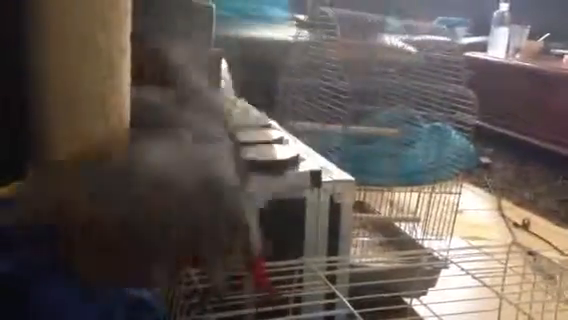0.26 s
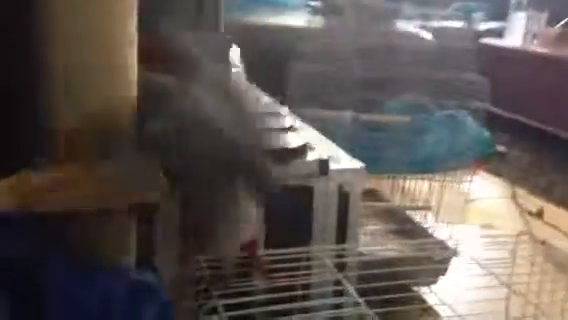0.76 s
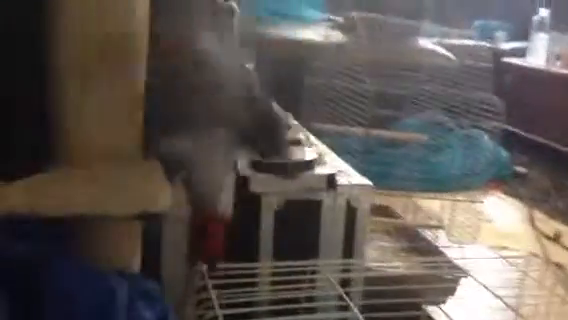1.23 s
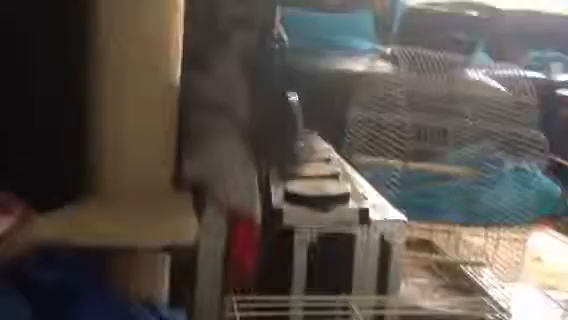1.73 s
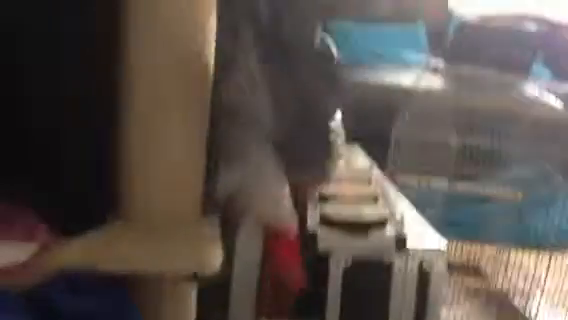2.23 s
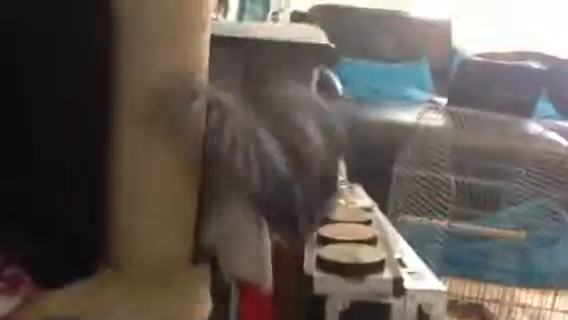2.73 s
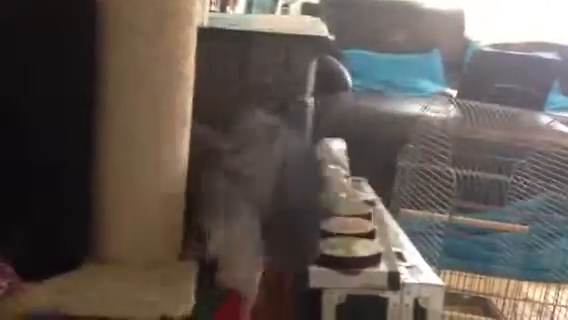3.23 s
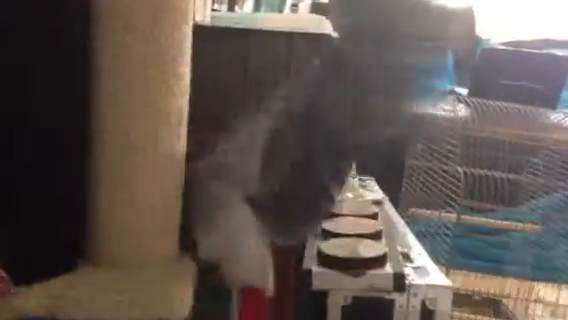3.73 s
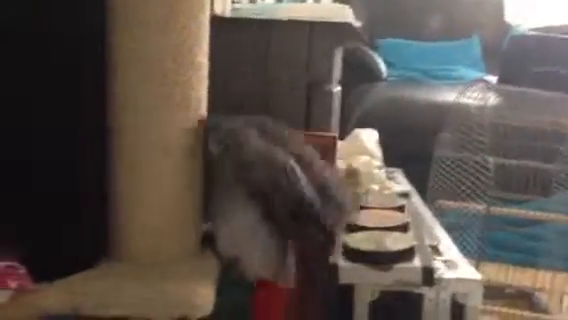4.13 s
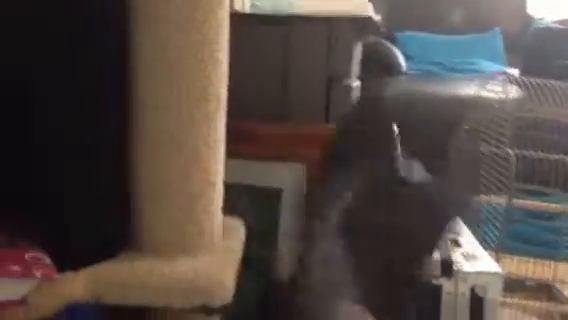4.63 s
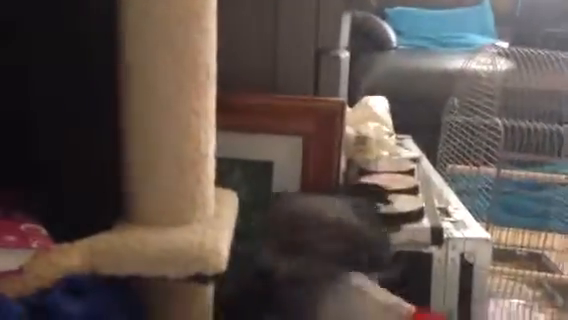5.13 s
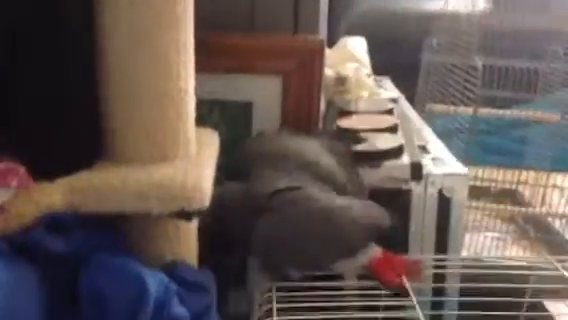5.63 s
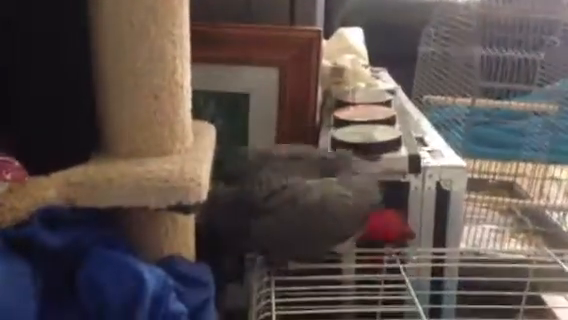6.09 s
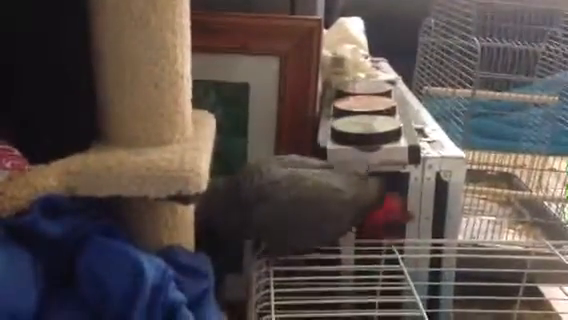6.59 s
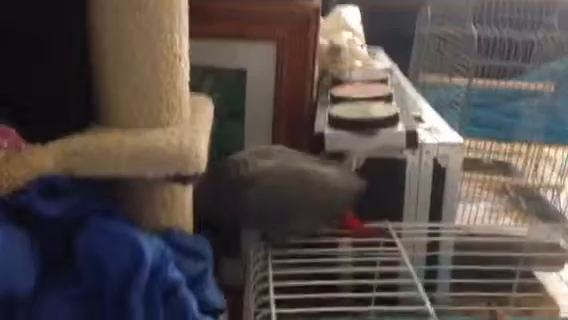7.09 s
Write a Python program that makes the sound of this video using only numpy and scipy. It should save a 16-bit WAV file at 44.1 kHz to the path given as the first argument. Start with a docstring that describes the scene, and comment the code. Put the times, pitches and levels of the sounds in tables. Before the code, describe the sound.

Quick wingbeats flutter and slap indoors until a bird thuds onto cage wire, followed by claw scrapes, a cluck and a small squeak.

```python
"""Parrot flapping on a cage

A grey parrot beats its wings on top of a wire cage in a small room, about six strokes a second.
Each stroke pushes air and rubs the feathers together, and the wing tips slap things nearby.
The bird hops down with a thud of the frame and a clash of wire, shuffles over the bars,
and gives a cluck of the tongue, a soft squeak and a faint whistle."""
import sys
import numpy as np
from scipy import signal
from scipy.io import wavfile

SR = 44100
rng = np.random.default_rng(int(sys.argv[2]) if len(sys.argv) > 2 else 0)


def wav_record(signal):
    """Record a signal, one row per channel, as 16-bit PCM in the file named by sys.argv[1]."""
    frames = np.transpose(np.atleast_2d(signal))
    bounded = np.clip(frames, -1, 1)
    # unit amplitude maps onto the largest positive 16-bit level
    quanta = np.round(bounded * 32767).astype(np.int16)
    wavfile.write(sys.argv[1], SR, quanta)


N = 324134
TIME = np.arange(N) / SR

# Levels in the tables are relative: the functions may add a gain of their own.
# downstrokes of the wings: t/s, length/s, level/dB
WING_BEATS = [(0, 0.026, -52.5), (.1, 0.055, -53.5), (.247, 0.046, -51.5), (0.402, 0.029, -50.5),
              (.562, 0.041, -49), (.717, 0.065, -53.5), (.867, 0.054, -50.5), (1.017, 0.056, -54),
              (1.169, 0.064, -55), (1.317, 0.044, -53.5), (1.48, 0.057, -58.5), (1.666, 0.058, -62.5),
              (1.869, .055, -58.5), (2.068, 0.056, -52), (2.19, 0.075, -56), (2.342, 0.089, -57),
              (2.495, 0.043, -54), (2.66, 0.063, -55.5), (2.835, 0.071, -61.5), (3.215, 0.046, -55),
              (3.357, .035, -51), (3.523, 0.073, -59.5), (3.714, 0.11, -62.5), (4.325, 0.1, -60),
              (4.395, 0.026, -47), (4.53, 0.053, -45)]
# how hard the wings drive the air (0 = loose fanning, 1 = full power): t/s, effort
WING_EFFORT = [(0, 0.86), (1.15, 0.89), (1.5, 0.25), (2.7, 0.091), (3.2, 0.12), (3.4, 0.85), (4.5, 0.4)]
# the folded wings are ruffled into place: t/s, length/s, level/dB
RUFFLES = [(4.98, 0.17, -66), (5.9, 0.059, -60.5), (6.82, 0.068, -67)]
# spectra of the pushed air, the air rushing past and the rubbing feathers: f/Hz, level/dB
PUSH_SPECTRUM = [(60, -46), (105, -32.5), (150, 1.5), (240, -3.5), (400, -6.5), (600, -12.5), (1000, -36),
                 (2000, -53)]
WHOOSH_SPECTRUM = [(250, -34), (450, -4.5), (700, -5), (1200, -3), (2100, -4.5), (3100, -10.5), (4500, -20),
                   (8000, -52)]
HISS_SPECTRUM = [(1200, -58.5), (2600, 1), (3700, -2.5), (6300, 4), (9000, -0.5), (12000, 1.5), (15500, -7)]
# rustling between strokes: t/s, level/dB
RUSTLE_LEVELS = [(0, -63), (.9, -58), (1.2, -54), (1.45, -60.5), (1.6, -64.5), (1.95, -61.5), (2.3, -59.5),
                 (2.7, -68), (3.3, -65.5), (4.3, -64.5), (4.5, -58), (4.9, -75), (5.05, -57), (5.2, -67.5),
                 (5.38, -63.5), (5.6, -70.5), (7.3, -67.5)]
# spectrum of that rustling: f/Hz, level/dB
RUSTLE_SPECTRUM = [(70, -33.5), (160, 9), (400, 0.5), (700, -2.5), (2200, -1), (3500, -3.5), (7000, -4.5),
                   (15000, -7)]
# wing tips slapping: t/s, contact/s, level/dB, tilt/(dB per octave), extra bass/dB, knock f/Hz, knock/dB
WING_SLAPS = [(0.81, .003, -57.5, 6, -4, 9620, 15), (1.227, 0.0064, -47, -2, 1.5, 2520, -5),
              (1.2372, 0.0012, -41, -1.6, -2, 2580, -6), (1.3969, 0.0012, -39, -.7, -0.5, 3400, 2),
              (1.7419, 0.0021, -48.5, 0.5, -14, 1920, 8), (1.768, .008, -51, -0.5, 3, 3960, -14),
              (2.548, 0.0026, -42.5, 1.5, 8, 4050, 5), (2.576, 0.0033, -49.5, -1.5, -7, 1760, 19),
              (2.8914, .002, -42.5, 1.5, 8, 2000, 1), (2.9106, 0.0025, -42.5, -0.5, 1, 2150, -3),
              (3.275, 0.0019, -40, 0, 1.5, 900, -8), (3.436, .0015, -48, -5, -16, 2780, 19),
              (3.438, 0.0012, -43.5, -2.5, -11, 1870, 20), (3.6254, .0011, -47.5, -3.5, -7.5, 1970, 1),
              (3.65, 0.0095, -55, 7, -8, 4340, -10), (3.8076, 0.0028, -47, 3, 7, 5660, 5),
              (4.4113, 0.0048, -35.5, -3, -5, 1840, -3), (4.4243, 0.00072, -36.5, -1.5, -6, 1790, 9),
              (4.532, .003, -47, 2.5, -2, 6500, 4), (4.5573, 0.00091, -40, -3.5, -5, 2720, 6)]

# hits on the wire, and one thin, dry, very high tick at 5.17 s:
# t/s, contact/s, level/dB, tilt/(dB per octave), knock f/Hz, knock/dB
WIRE_HITS_AND_TICK = [(4.5861, 0.0031, -21.5, -0.5, 1984, 5), (4.781, 0.0049, -48, -4, 1225, 15),
                      (4.961, 0.0034, -60.5, 1, 4350, 2), (5.0335, 0.0022, -52.5, -2, 1710, 5),
                      (5.091, 0.0025, -57.5, 3, 8100, 5), (5.1733, .0006, -73, 10.5, 13500, 28),
                      (5.2505, 0.0033, -48, 0.6, 5550, -15), (6.255, 0.0012, -73, 5.5, 7940, 11),
                      (7.02, 0.0033, -60.5, 6, 9000, 4)]
# the bass, middle, treble and top bands of a hit: low f/Hz, high f/Hz
HIT_BANDS = [(160, 650), (650, 3000), (3400, 8500), (8500, 15500)]
# tone of a slap and of a wire hit before tilting: bass/dB, middle/dB, treble/dB, top/dB
SLAP_COLOUR = (-10.5, -1.5, 1.5, -4)
WIRE_COLOUR = (-29.5, -3, -1.5, -6)
# the bird's weight coming down on the cage: t/s, level/dB
THUDS = [(4.423, -43.5), (4.528, -43.5), (4.551, -44.5), (4.575, -47), (4.612, -45.5), (4.655, -47),
         (4.819, -49.5), (5.29, -57.5), (6.985, -58.5), (7.292, -55)]
# a claw lets go of a bar: t/s, level/dB
TWANGS = [(5.254, -44.5)]
# claws dragging along the bars: t/s, length/s, level/dB, f/Hz
SCRAPES = [(3.993, 0.28, -69, 2050), (4.779, 0.042, -45, 1180), (4.796, 0.045, -82, 1800),
           (4.852, 0.096, -57.5, 1130), (5.239, 0.083, -58, 2270), (5.385, 0.062, -58.5, 2050),
           (6.818, 0.067, -64, 1750), (7.253, 0.074, -69, 1820)]
# the bird shuffling about: t/s, length/s, level/dB
SHUFFLES = [(4.852, 2.53, -66)]
# where a gripped bar, a free bar, the frame and the beak ring: f/Hz, width/Hz, level/dB
GRIPPED_BAR_MODES = [(2040, 200, -3.5), (4070, 170, 6.5), (4920, 50, 14.5), (5670, 67, 9), (6810, 38, 0),
                     (9250, 40, -1), (11000, 350, 5.5)]
FREE_BAR_MODES = [(2350, 22, -3), (3740, 40, -8), (4640, 40, -7), (5570, 35, 0), (6465, 60, -7)]
FRAME_MODES = [(160.3, 17, 8.5), (203, 18, 10), (255.5, 63, 10), (352, 120, -2.5), (503, 38, 1.5)]
BEAK_MODES = [(827, 24, 4), (1640, 210, 0), (2390, 85, 0), (3030, 77, -29), (4910, 48, -3), (6200, 66, -5),
              (6940, 44, -26), (8300, 40, -5)]

# spurts of the squeak: t/s, length/s, level/dB
SQUEAK_SPURTS = [(6.366, 0.029, -42.5), (6.425, 0.019, -49), (6.508, 0.011, -48), (6.56, 0.051, -58)]
# harmonics of the squeak: multiple of the pitch, level/dB
SQUEAK_HARMONICS = [(1, -3), (2, -4), (3, -15.5)]
# the one whistle: t/s, length/s, level/dB
WHISTLE = [(6.73, 0.16, -74.5)]

# how long the room's echo takes to fade by 60 dB: f/Hz, fade time/s
ROOM_FADE_TIMES = [(150, 0.57), (600, 0.72), (2000, 0.33), (5000, 0.45), (9000, 0.32), (15000, 0.39)]
# spectrum of the room's background noise: f/Hz, level/dB
ROOM_TONE_SPECTRUM = [(18, -74), (30, -35), (105, -22), (144, -9.5), (256, -6.5), (639, -19.5), (728, -36),
                      (1230, -17.5), (2070, -28), (2830, -23), (3320, -26), (3980, -25.5), (5310, -26),
                      (6720, -25), (15500, -33)]


def wings(rise_s=0.0053, loose_rise_s=0.016, fall_s=0.023, push_fade_s=0.073, whoosh_fade_s=0.31):
    """Each stroke pushes air, sends it rushing past the wing and slides the feathers over each other."""
    push, whoosh, hiss = np.zeros((3, N))
    for s, length, db, effort in strokes():
        slack = 1 - effort  # a loose stroke swells more slowly and moves less air
        stroke = swell(s, length, rise_s + loose_rise_s * slack ** 2, fall_s)
        age = np.maximum(TIME - s, 0)
        push += from_db(db - 3.5 - 13.5 * slack) * stroke * np.exp(-age / push_fade_s)
        whoosh += from_db(db - 2.75 - 2.5 * slack) * stroke * np.exp(-age / whoosh_fade_s)
        hiss += from_db(db) * stroke
    # after a slap the feathers slide off the edge they hit
    slides = [from_db(db - 12.5) * swell(s + rise_s, 0.039, rise_s, fall_s)
              for s, _, db, *_ in WING_SLAPS]
    hiss += np.max(slides, axis=0)
    hiss = np.interp(TIME - 0.0025, TIME, hiss)  # the hiss comes a moment after the air
    thump = push * (shaped_noise(PUSH_SPECTRUM) + from_db(2) * eddy())
    rush = whoosh * shaped_noise(WHOOSH_SPECTRUM)
    # the feathers' tiny barbs catch and let go in grains of very uneven size
    barbs = rng.standard_normal((2, N)) * flicker(rate_hz=1500, depth_db=2)
    rubbing = hiss * shaped_noise(HISS_SPECTRUM, barbs)
    return thump + (rush + rubbing) * flicker(rate_hz=130, depth_db=3)


def strokes(upstroke_lag_s=0.083, upstroke_s=0.021):
    """Lists downstrokes, lighter upstrokes and effortless ruffles: t/s, length/s, level/dB, effort."""
    for s, length, db in WING_BEATS:
        effort = np.interp(s, *np.transpose(WING_EFFORT))
        yield s, length, db, effort
        upstroke_db = db - 0.5 - 17.5 * (1 - effort)
        yield s + upstroke_lag_s, upstroke_s, upstroke_db, 0.72 * effort
    for s, length, db in RUFFLES:
        yield s, length, db, 0


def eddy(start_hz=480, end_hz=290, slowing_s=0.023, width_hz=130):
    """The swirl of air left by each downstroke hums hollowly and drops in pitch as it slows."""
    starts = np.sort([beat[0] for beat in WING_BEATS])
    latest = np.maximum(np.searchsorted(starts, TIME) - 1, 0)
    age = np.maximum(TIME - starts[latest], 0)
    phase = phase_of(end_hz + (start_hz - end_hz) * np.exp(-age / slowing_s))
    return rms_one(drift(width_hz) * np.cos(phase) + drift(width_hz) * np.sin(phase))


def rustle():
    """The feathers keep rustling between strokes while the bird is busy."""
    level = from_db(np.interp(TIME, *np.transpose(RUSTLE_LEVELS)))
    return level * flicker(rate_hz=35, depth_db=2) * shaped_noise(RUSTLE_SPECTRUM)


def slaps(gain_db=-2):
    """Stiff wing feathers crack against a hard edge."""
    out = np.zeros(N)
    for s, length, db, tilt, bass_db, knock_hz, knock_db in WING_SLAPS:
        levels_db = hit_levels(SLAP_COLOUR, db, tilt, bass_db)
        edge = lambda x: knock(x, levels_db, knock_hz, knock_db)
        out += strike(s, edge, contact(length, snap=1), echo_db=-3.5)
    return from_db(gain_db) * out


def wire_hits_and_tick():
    """The bars chatter briefly at each hit; the same recipe makes one thin, very high tick."""
    out = np.zeros(N)
    for s, length, db, tilt, knock_hz, knock_db in WIRE_HITS_AND_TICK:
        levels_db = hit_levels(WIRE_COLOUR, db, tilt)
        chatter = lambda x: knock(wire(x), levels_db, knock_hz, knock_db)
        out += strike(s, chatter, contact(length, snap=0.12), echo_db=0)
    return out


def wire(x, bass_cut_hz=1200):
    """Thin bars give off little bass, and the bird's grip keeps their ringing short."""
    bright = signal.sosfilt(signal.butter(1, bass_cut_hz, "high", fs=SR, output="sos"), x)
    return bright + from_db(-3) * resonate(bright, GRIPPED_BAR_MODES)


def thuds():
    """Soft, heavy steps set the whole frame booming."""
    out = np.zeros(N)
    for s, db in THUDS:
        frame = lambda x: at_level(band(resonate(x, FRAME_MODES), 120, 600, order=4), db)
        out += strike(s, frame, contact(0.0037, snap=0.75), echo_db=2)
    return out


def twang():
    """A bar rings on with a short clink when the claw lets go."""
    out = np.zeros(N)
    for s, db in TWANGS:
        bar = lambda x: at_level(resonate(x, FREE_BAR_MODES), db)
        out += strike(s, bar, contact(0.001078, snap=3.6), echo_db=-4)
    return out


def scrapes(width_hz=550):
    """A claw sticks and slips on a bar, rasping around one pitch."""
    out = np.zeros(N)
    slips = rng.standard_normal(N) * flicker(rate_hz=250, depth_db=4)
    for s, length, db, hz in SCRAPES:
        rasp = rms_one(resonate(slips, [(hz, width_hz, 0)]))
        out += from_db(db) * swell(s, length, rise_s=0.0061, fall_s=0.01) * rasp
    return out


def shuffling():
    """Small shifts of weight keep the frame rumbling softly."""
    shaking = resonate(rng.standard_normal(N), FRAME_MODES) + 0.65 * rng.standard_normal(N)
    rumble = rms_one(band(shaking, 130, 700, order=4))
    return rumble * flicker(rate_hz=12, depth_db=2) * swells(SHUFFLES, rise_s=0.05, fall_s=0.05)


def cluck(start_s=6.0503, level_db=-54.5, click_db=-14.5):
    """A short click of the tongue rings in the open beak."""
    beak = lambda x: at_level(resonate(x, BEAK_MODES) + from_db(click_db) * band(x, 1070, 7400), level_db)
    return strike(start_s, beak, contact(0.0013, snap=0.18), echo_db=9.5)


def squeak(start_hz=813, end_hz=1070, glide_s=0.1, gain_db=-7.5):
    """A hoarse little note rises and breaks up into fading spurts."""
    age = np.maximum(TIME - SQUEAK_SPURTS[0][0], 0)
    hz = end_hz + (start_hz - end_hz) * np.exp(-age / glide_s)
    phase = phase_of(hz * (1 + 0.07 * drift(500)))
    tone = rms_one(sum(from_db(db) * np.sin(k * phase) for k, db in SQUEAK_HARMONICS))
    hoarseness = 0.7 + 0.75 * drift(220) + 0.65 * drift(800)
    return from_db(gain_db) * tone * hoarseness * swells(SQUEAK_SPURTS, rise_s=0.0019, fall_s=0.0071)


def whistle(start_hz=1890, sag_hz_per_s=800, waver=0.0154):
    """A faint, thin whistle wavers and sags in pitch."""
    s, length, db = WHISTLE[0]
    hz = start_hz - sag_hz_per_s * np.clip(TIME - s, 0, length)
    tone = rms_one(np.sin(phase_of(hz * (1 + waver * drift(300)))))
    return from_db(db) * swell(s, length, rise_s=0.022, fall_s=0.015) * tone


def room_echo(x, gap_s=0.0028, early_db=1, early_s=0.025):
    """The walls throw sound back: strongly at first, then dying away, the treble before the bass."""
    t = TIME[:SR * 3 // 5]
    noises = rng.standard_normal((2, len(t)))
    tail = np.zeros(len(t))
    for k, low_hz in enumerate(66 * 2.0 ** np.arange(8)):  # one octave at a time
        fade_s = at_hz(ROOM_FADE_TIMES, low_hz * np.sqrt(2))
        tail += band(noises[k % 2], low_hz, 2 * low_hz) * from_db(-60 * t / fade_s)
    early_boost = 1 + from_db(early_db) * np.exp(-t / early_s)
    return signal.fftconvolve(x, energy_one(tail * (t > gap_s) * early_boost))[:N]


def room_tone(level_db=-64):
    """A faint, steady noise fills the room."""
    return from_db(level_db) * shaped_noise(ROOM_TONE_SPECTRUM)


def strike(s, body, touch, echo_db):
    """A touch sounds through a body. The room gathers it from all sides, so it echoes as a clean tap."""
    out = np.zeros(N)
    add(out, s, body(touch))
    clean_tap = body(signal.unit_impulse(len(touch)))
    add(out, s, from_db(echo_db) * room_echo(clean_tap))
    return out


def contact(peak_s, snap):
    """A rush of tiny touches swells and dies, with one sharp touch, the snap, at its peak."""
    progress = TIME[:SR // 4] / peak_s
    rush = energy_one(rng.standard_normal(len(progress)) * progress * np.exp(-progress))
    rush[np.argmax(progress >= 1)] += snap
    return rush


def knock(touch, levels_db, hz, knock_db):
    """A struck spot rings at its own pitch; each band from bass to top is then set to its level."""
    sound = touch + resonate(touch, [(hz, hz / 6, knock_db)])
    return sum(at_level(band(sound, low, high, order=3), db)
               for (low, high), db in zip(HIT_BANDS, levels_db))


def hit_levels(colour, db, tilt, bass_db=0, pivot_hz=3000):
    """Band levels of a hit in dB: a harder contact tilts them towards the treble, weight adds bass."""
    centres_hz = np.sqrt(np.prod(HIT_BANDS, axis=1))
    levels_db = db + np.array(colour) + tilt * np.log2(centres_hz / pivot_hz)
    levels_db[0] += bass_db
    return levels_db


def resonate(x, modes):
    """Lets a sound ring at each of an object's modes; a narrower mode rings longer."""
    out = 0
    for hz, width_hz, db in modes:
        decay = np.exp(-np.pi * width_hz / SR)
        feedback = [1, -2 * decay * np.cos(2 * np.pi * hz / SR), decay ** 2]
        ringing = signal.lfilter([1, 0, -1], feedback, x + 1e-18)
        out += from_db(db) * (1 - decay ** 2) / 2 * ringing
    return out


def shaped_noise(spectrum, noises=None):
    """Builds noise with a given spectrum; neighbouring bands take turns between two unrelated noises."""
    if noises is None:
        noises = rng.standard_normal((2, N))
    edges_hz = np.geomspace(28, 18000, 23)
    out = np.zeros(N)
    for k, (low, high) in enumerate(zip(edges_hz, edges_hz[1:])):
        out += from_db(at_hz(spectrum, np.sqrt(low * high))) * band(noises[k % 2], low, high)
    return rms_one(out)


def swell(s, length, rise_s, fall_s):
    """A volume curve that opens softly at time s and closes after the length."""
    out = np.zeros(N)
    near = slice(max(0, int((s - 8 * rise_s) * SR)), int((s + length + 8 * fall_s) * SR))
    age = TIME[near] - s
    out[near] = (1 + np.tanh(age / rise_s)) * (1 - np.tanh((age - length) / fall_s)) / 4
    return out


def swells(rows, rise_s, fall_s):
    """A volume curve with one swell for each row of a table."""
    return sum(from_db(db) * swell(s, length, rise_s, fall_s) for s, length, db in rows)


def drift(rate_hz):
    """A random wander of typical size 1."""
    points = rng.standard_normal(int(N / SR * rate_hz) + 2)
    return rms_one(np.interp(TIME * rate_hz, np.arange(len(points)), points))


def flicker(rate_hz, depth_db):
    """A gain that wanders up and down at random."""
    return from_db(depth_db * drift(rate_hz))


def phase_of(hz):
    """The running angle of a wave whose pitch changes."""
    return 2 * np.pi * np.cumsum(hz) / SR


def band(x, low_hz, high_hz, order=2):
    """Keeps the sound between two frequencies."""
    return signal.sosfilt(signal.butter(order, [low_hz, high_hz], "band", fs=SR, output="sos"), x + 1e-18)


def at_hz(table, hz):
    """Reads a table's value at a frequency."""
    freqs, values = np.transpose(table)
    return np.interp(np.log(hz), np.log(freqs), values)


def add(track, s, sound):
    """Lays a sound into the track at time s."""
    start = max(0, round(s * SR))
    track[start:start + len(sound)] += sound[:N - start]


def at_level(sound, db):
    """Sets a short sound's level as if its energy were spread over 16 ms."""
    return from_db(db) * energy_one(sound) * np.sqrt(0.016 * SR)


def from_db(db):
    """Turns decibels into a gain."""
    return 10 ** (np.asarray(db) / 20)


def rms_one(x):
    """Scales to an average power of 1."""
    return x / np.sqrt(np.mean(x ** 2) + 1e-20)


def energy_one(x):
    """Scales to a total energy of 1."""
    return x / np.sqrt(np.sum(x ** 2) + 1e-20)


def scene():
    """The bird, the cage and the room, mixed into one channel."""
    feathers = wings() + rustle()
    small_sounds = scrapes() + squeak() + whistle()
    room = room_echo(from_db(-9) * feathers + from_db(-2.5) * small_sounds) + room_tone()
    hits = slaps() + wire_hits_and_tick() + twang() + thuds()  # these and the cluck bring their own echo
    return (feathers + small_sounds + hits + shuffling() + cluck() + room)[None]


def record(dry, cutoff_hz=15400):
    """Cuts off the very highest treble."""
    return signal.sosfilt(signal.ellip(10, 0.2, 80, cutoff_hz, fs=SR, output="sos"), dry)


dry = scene()
out = record(dry)
wav_record(out)
```